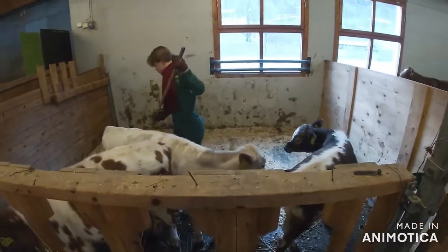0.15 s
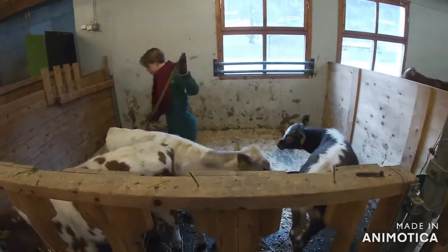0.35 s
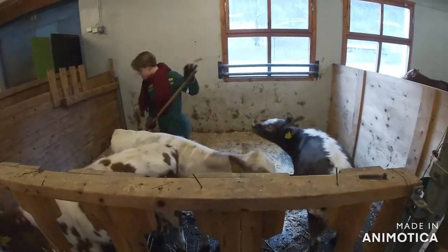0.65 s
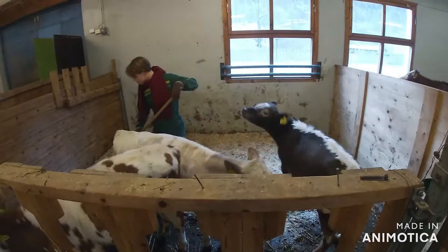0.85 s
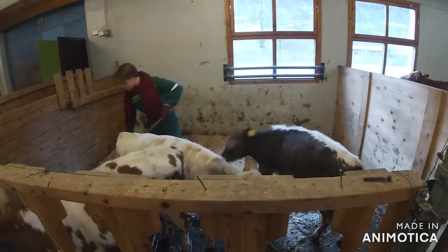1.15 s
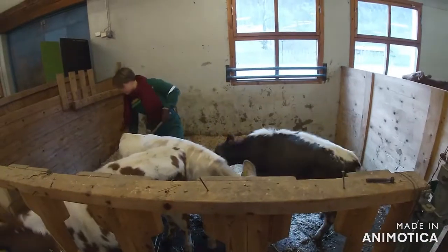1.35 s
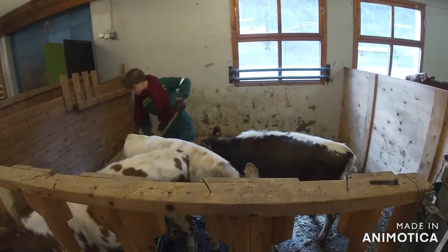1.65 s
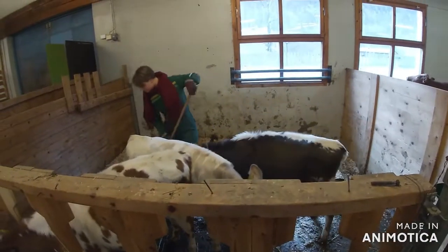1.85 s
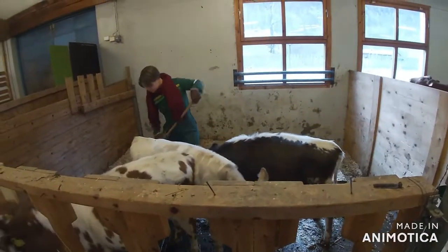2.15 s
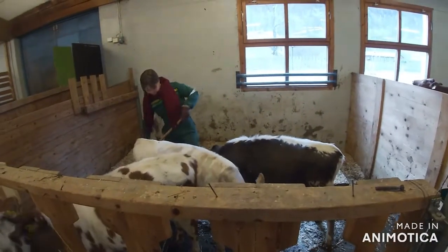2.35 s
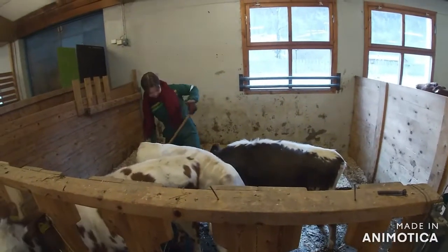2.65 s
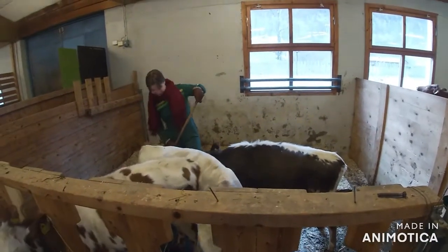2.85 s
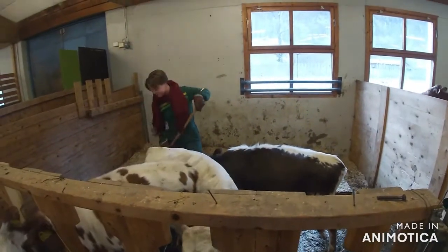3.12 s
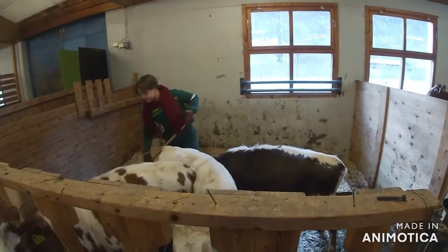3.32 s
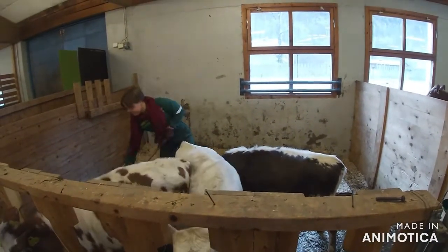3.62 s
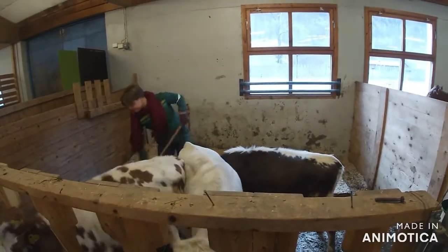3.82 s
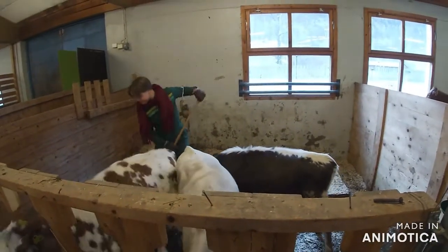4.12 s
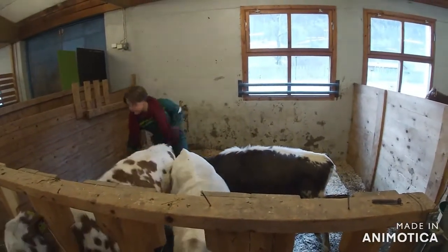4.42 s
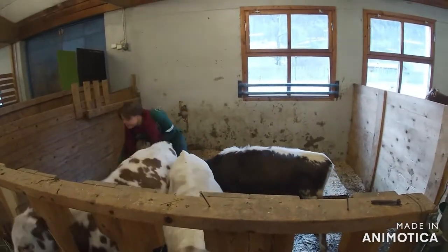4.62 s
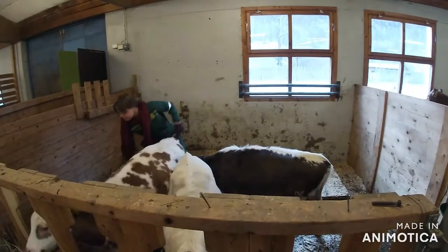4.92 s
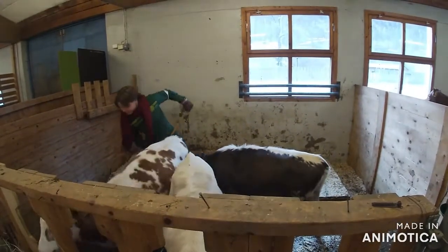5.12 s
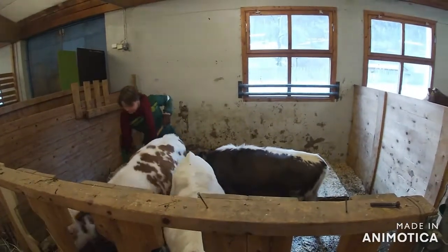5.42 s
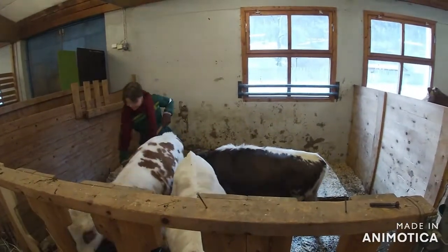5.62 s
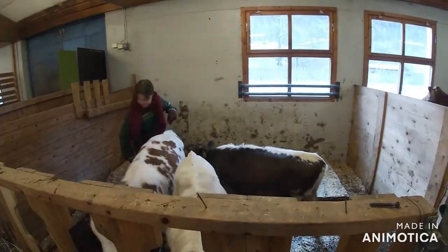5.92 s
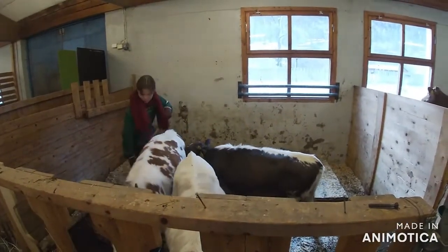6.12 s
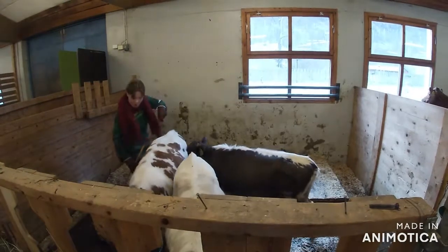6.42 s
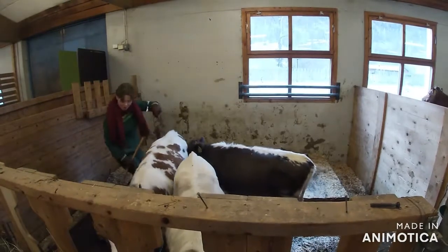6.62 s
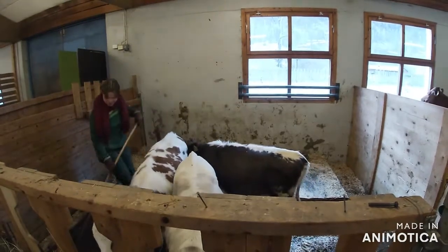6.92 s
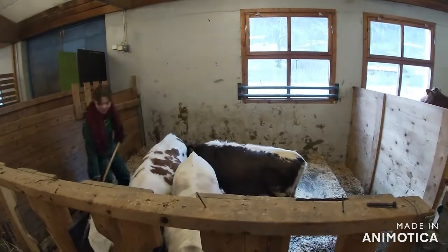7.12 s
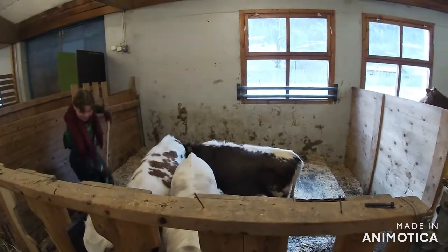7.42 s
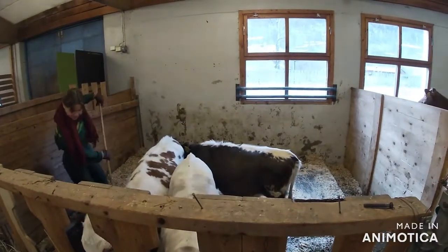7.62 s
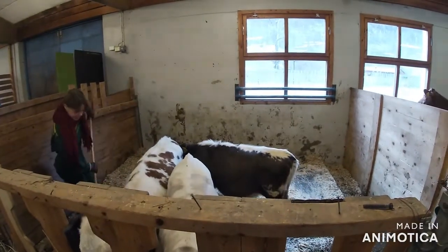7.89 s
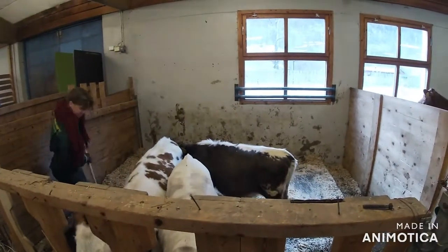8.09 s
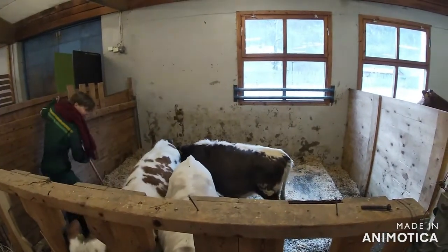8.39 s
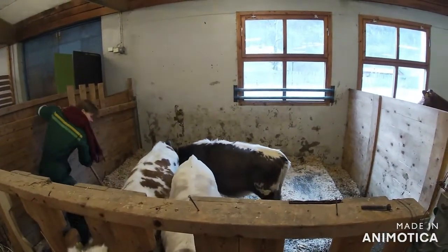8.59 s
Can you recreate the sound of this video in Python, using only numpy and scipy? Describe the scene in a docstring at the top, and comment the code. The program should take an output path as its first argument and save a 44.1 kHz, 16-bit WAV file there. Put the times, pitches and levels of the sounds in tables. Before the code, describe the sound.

A single calf moo dominates the opening three seconds: a muffled hum swelling upward, a bright open-mouthed call, then a tired, growling fall. The rest is quieter barn work, with short fork drags, soft bedding thuds, crackling straw and occasional knocks on floor or wood. Little birds give quick falling chirps throughout. The hard-walled space rings slightly around the mono pickup at moderate distance, over gentle air hiss and rumble.

```python
"""A calf moos once in a hard-walled barn: a closed-mouth hum climbs, bursts open, holds and sinks away.
Its voice is a train of sharp pulses, shaped by the nose and then by the open mouth.
A long-handled fork scrapes and knocks in the straw bedding and hooves shuffle: tiny random slips and noise blows.
Small birds chirp under the roof with gliding, fluttering tones, over steady air noise and a low rumble."""
import sys
import numpy as np
from scipy import signal
from scipy.fft import rfft, irfft, next_fast_len
from scipy.io import wavfile
from scipy.ndimage import uniform_filter1d, map_coordinates

SR = 44100
rng = np.random.default_rng(int(sys.argv[2]) if len(sys.argv) > 2 else 0)


def wav_record(signal):
    """Record a signal, one row per channel, as 16-bit PCM in the file named by sys.argv[1]."""
    frames = np.transpose(np.atleast_2d(signal))
    bounded = np.clip(frames, -1, 1)
    # unit amplitude maps onto the largest positive 16-bit level
    quanta = np.round(bounded * 32767).astype(np.int16)
    wavfile.write(sys.argv[1], SR, quanta)


N = 385875
TIME = np.arange(N) / SR


def from_db(db):
    """Turn decibels into a plain gain."""
    return 10 ** (np.asarray(db) / 20)


def rms_one(x):
    """Scale a sound to an average (rms) strength of one."""
    return x / np.sqrt(np.mean(x ** 2) + 1e-20)


def in_time(rows, t=TIME):
    """Read every column of a timed table at the times t, with straight lines between rows."""
    s, *columns = np.transpose(rows)
    return [np.interp(t, s, c) for c in columns]


def at_hz(points, hz):
    """Read a table of frequencies on a log-frequency axis."""
    f, value = np.transpose(points)
    return np.interp(np.log(hz + 1e-3), np.log(f), value)


def gate(t, start, end, fade):
    """One between start and end, with short ramps outside."""
    return np.clip(1 + np.minimum(t - start, end - t) / fade, 0, 1)


def band(x, low_hz, high_hz):
    """Keep only the sound between two frequencies."""
    sos = signal.butter(2, [low_hz, min(high_hz, .45 * SR)], "band", fs=SR, output="sos")
    return signal.sosfilt(sos, x)


def colour(x, spectrum):
    """Shape a sound by a spectrum, weaken the deepest bass and scale to rms one."""
    size = next_fast_len(len(x))
    hz = np.arange(size // 2 + 1) * SR / size
    gain = from_db(at_hz(spectrum, hz)) * hz / (hz + 10)
    return rms_one(irfft(rfft(x, size) * gain, size)[:len(x)])


def drift(rate, t=TIME):
    """Random wander around zero, with `rate` new random targets per unit of t."""
    knots = rng.standard_normal(8192)
    return np.interp(t * rate % 8191, np.arange(8192), knots)


def grains(per_s, spread_db):
    """Random tiny slips and snaps of uneven size."""
    sizes = from_db(spread_db * np.minimum(rng.exponential(1, N), 4)) * rng.standard_normal(N)
    return rms_one(sizes * (rng.random(N) < per_s / SR))


def at_level(x, db):
    """Even out a sound and give it a level curve."""
    power = np.abs(uniform_filter1d(x * x, size=2048))
    return from_db(db) * x / np.sqrt(power + 1e-9)


def add(out, s, sound):
    """Mix a sound in at time s."""
    at = max(int(s * SR), 0)
    out[at:at + len(sound)] += sound


# how long the barn rings: (frequency [Hz], time to fall by 60 dB [s])
BARN = [(100,1.01),(400,1.195),(1000,0.54),(3000,0.61),(8000,0.31)]


def barn(x, wet_db):
    """Direct sound plus a scattered tail, mostly shorter in the treble; the total power is kept."""
    t, tail = TIME[:SR], 0
    edges = 45 * 2. ** np.arange(10)  # octave bands [Hz]
    for low, high in zip(edges, edges[1:]):
        t60 = at_hz(BARN, np.sqrt(low * high))
        tail = tail + band(rng.standard_normal(SR), low, high) * from_db(-60 * t / t60)
    onset = np.clip(t / 0.0017 - .5, 0, 1)  # a tiny gap before the tail
    tail = rms_one(tail * onset) / np.sqrt(SR)
    wet = from_db(wet_db)
    return (x + wet * signal.fftconvolve(x, tail)[:N]) / np.sqrt(1 + wet ** 2)


# colour of the barn air: (frequency [Hz], relative level per Hz [dB])
AIR = [(20,-26.5),(170,6),(400,-4),(850,-2.5),(2000,-18.5),(3000,-9.5),(6400,-21.5),(9000,-36.5),(15000,-72)]
AIR_DB = -45
# the rumble's middle level, its random swing, and new swing targets per second
RUMBLE_DB, RUMBLE_SWING_DB, RUMBLE_TURNS_PER_S = -52.5, 11, 2.1


def background():
    """Steady barn air is coloured noise; the low rumble is bass noise that comes and goes."""
    air = from_db(AIR_DB) * colour(rng.standard_normal(N), AIR)
    rumble_db = RUMBLE_DB + RUMBLE_SWING_DB * drift(RUMBLE_TURNS_PER_S)
    rumble = from_db(rumble_db) * rms_one(band(rng.standard_normal(N), 48, 86))
    return air + rumble


def chirp(length, start_hz, end_hz, warble=0.039, warble_rate=450, flutter=0.8):
    """A whistle that glides between two pitches; random warble and flutter make it harsh."""
    t = TIME[:int(length * SR)]
    hz = start_hz * (end_hz / start_hz) ** (t / length) * (1 + warble * drift(warble_rate, t))
    loudness = np.sin(np.pi * t / length) * np.exp(flutter * drift(warble_rate / 2, t))
    return loudness * np.sin(2 * np.pi * np.cumsum(hz) / SR)


def arch(length, top_hz, bend_octaves=0.42):
    """A clear note that bends up to its top and down again."""
    u = np.linspace(-1, 1, int(length * SR))
    hz = top_hz / 2 ** (bend_octaves * u ** 2)
    return np.sqrt(1 - u ** 2) * np.sin(2 * np.pi * np.cumsum(hz) / SR)


# falling chirps: (time [s], start pitch [Hz], level [dB])
CHIRPS = [(0,4910,-36),(.128,5890,-30.5),(.45,5740,-38),(.8,5270,-38.5),(1.525,5750,-41),(2.941,6320,-53),(3.141,5210,-57),(3.385,4400,-45),(3.545,5720,-40),(4.125,4690,-38.5),
          (4.38,5280,-41),(4.63,6460,-43),(4.9,4740,-42),(5.24,6580,-41),(5.711,5360,-34),(6.4,4910,-40),(6.824,4000,-38.5),(8.239,6240,-44.5),(8.38,6990,-50),(8.69,5760,-27.5)]
CHIRP_END_HZ, CHIRP_FALL_OCTAVES_PER_S = 3094, 6.6
# clear arched notes: (time [s], top pitch [Hz], level [dB])
ARCHES = [(0.29,4990,-31),(.785,4880,-37),(5.93,3740,-34.5),(7.341,3920,-37),(7.405,3580,-37.5)]
ARCH_S = 0.043
# quick upward flicks: (time [s], level [dB])
FLICKS = [(6.594,-45.5),(6.724,-42),(6.804,-43)]
FLICK_S, FLICK_START_HZ, FLICK_END_HZ = 0.062, 4730, 7250
# thin sagging whistles: (time [s], level [dB])
WHISTLES = [(6.99,-44.5),(7.845,-48.5)]
WHISTLE_S, WHISTLE_START_HZ, WHISTLE_END_HZ = 0.21, 3380, 2850


def birds(lower_ratio=.82, lower_db=-7, far_db=-65, far_hz=4300, count=30):
    """Chirps and flicks use both sides of the voice organ, one lower and weaker; other notes are single."""
    # more birds twitter farther off, at random times and pitches
    far = [(s * N / SR, far_hz * 2 ** (high / 2), far_db) for s, high in rng.random((count, 2))]
    glides = [(s, FLICK_S, FLICK_START_HZ, FLICK_END_HZ, db) for s, db in FLICKS]
    for s, hz, level_db in CHIRPS + far:
        length = np.log2(hz / CHIRP_END_HZ) / CHIRP_FALL_OCTAVES_PER_S
        glides.append((s, length, hz, CHIRP_END_HZ, level_db))
    harsh, pure = np.zeros((2, N + SR))
    for s, length, start_hz, end_hz, level_db in glides:
        upper = chirp(length, start_hz, end_hz)
        lower = chirp(length, lower_ratio * start_hz, lower_ratio * end_hz)
        add(harsh, s, from_db(level_db) * (upper + from_db(lower_db) * lower))
    for s, top_hz, level_db in ARCHES:
        add(pure, s, from_db(level_db) * arch(ARCH_S, top_hz))
    for s, level_db in WHISTLES:
        whistle = chirp(WHISTLE_S, WHISTLE_START_HZ, WHISTLE_END_HZ, warble=0.0068, flutter=0.16)
        add(pure, s, from_db(level_db) * whistle)
    return barn(harsh[:N], wet_db=3) + barn(pure[:N], wet_db=0.5)


def swell(s, build_s, fall_db_per_s, rise_db=14):
    """Gain of one push: it rises by rise_db during build_s, peaks at s and dies away."""
    rise = rise_db * (TIME - s) / build_s
    fall = fall_db_per_s * (s - TIME)
    return from_db(np.maximum(np.minimum(rise, fall), -120))


# fork strokes and shuffles: (peak time [s], build-up [s], thud level [dB], scrape level [dB])
STROKES = [(0.018,0.12,-44,-46),(1.77,0.57,-29,-40),(2.678,0.1,-26.5,-56.5),(3.904,0.12,-26.5,-31.5),(4.06,0.26,-30.5,-41),(4.885,0.17,-31,-34.5),(5.039,0.38,-32.5,-31.5),
           (5.55,0.2,-36,-43.5),(6.41,0.096,-37,-37),(6.56,0.26,-35,-49),(7.35,0.26,-34,-43),(7.55,0.28,-44,-43.5),(8.42,0.1,-37.5,-48)]
# dry straw stirred or tossed: (peak time [s], build-up [s], level [dB])
TOSSES = [(.1,1,-52),(1.35,0.98,-48),(3.97,0.16,-49),(5.05,0.19,-44),(5.7,0.41,-51),(6.8,1,-49),(7.56,0.26,-39.5)]
STROKE_FALL_DB_PER_S, TOSS_FALL_DB_PER_S = 103, 115.5
# colours of packed bedding, dragged fork and dry stalks: (frequency [Hz], relative level per Hz [dB])
THUD = [(35,-2.5),(80,-0.5),(190,2.5),(300,-3.5),(600,-58.5)]
SCRAPE = [(150,-9.5),(270,-3),(550,8),(850,-5),(2400,-13.5),(7000,-50)]
STRAW = [(700,-18.5),(1500,-9),(5800,-7),(7500,-13),(15000,-45)]


def bedding():
    """The fork drags over the floor in small slips, the packed bedding thuds and dry stalks crackle."""
    thud_gain = scrape_gain = straw_gain = 0
    for s, build_s, thud_db, scrape_db in STROKES:
        push = swell(s, build_s, STROKE_FALL_DB_PER_S)
        thud_gain = np.maximum(thud_gain, from_db(thud_db) * push)
        scrape_gain = np.maximum(scrape_gain, from_db(scrape_db) * push)
    for s, build_s, level_db in TOSSES:
        straw_gain = straw_gain + from_db(level_db) * swell(s, build_s, TOSS_FALL_DB_PER_S)
    thud = thud_gain * colour(grains(1000, spread_db=-0.7), THUD)
    scrape = scrape_gain * colour(grains(1100, spread_db=-1.5), SCRAPE)
    straw = straw_gain * colour(grains(5000, spread_db=-2.5), STRAW)
    return barn(thud + scrape + straw, wet_db=-9.0)


# the calf's voice: (time [s], pitch [Hz])
PITCH = [(.27,84.3),(.37,90.74),(.64,101.8),(1.04,139.4),(1.2,150.1),(1.33,163),(1.66,170.9),(2.28,168.6),(2.48,163.9),(2.64,160.9),(2.8,152.2),(2.97,132.7)]
JITTER = .005  # uneven cycle lengths at full roughness (share)


def vocal_folds(t, rough, count=62):
    """The folds give one sharp pulse a cycle, a sum of equal harmonics, unevenly timed under strain."""
    pitch, = in_time(PITCH, t)
    wobble = JITTER * rough * drift(140, t) + 0.00056 * drift(21.77, t)
    cycles = np.cumsum(pitch * (1 + wobble)) / SR
    off = cycles - np.round(cycles)
    folds = rms_one(np.sinc((2 * count + 1) * off) / np.sinc(off))
    return pitch, cycles, folds


# the moo starts as a hum, the mouth bursts open, the voice stops
HUM_START_S, OPEN_S, END_S = 0.17, 1.052, 2.96
# the nasal overtones swell steadily until the mouth opens
NASAL_DB, NASAL_SWELL_DB_PER_S = -46, 19.5
# resonances of the nose: (frequency [Hz], relative level [dB])
NOSE = [(120,-4),(190,2.5),(520,-5),(1000,-7),(1400,-21.5),(2500,-18),(2850,-6.5),(3200,-16.5),(6500,-24.5),(11000,-54)]
# a nasal resonance sinks as the head stretches forward: (time [s], centre [Hz], level beside the nose [dB])
STRETCH = [(.62,2680,-16.5),(.8,2141,-3),(1.0,2090,-4)]


def nasal_overtones(t, pitch, cycles, folds, width_hz=170):
    """With the mouth shut, each pulse rings the nose and its sinking resonance."""
    stretch_hz, stretch_db = in_time(STRETCH, t)
    since = cycles % 1 / pitch  # seconds since the last pulse
    sinking = rms_one(np.sin(2 * np.pi * stretch_hz * since) * np.exp(-np.pi * width_hz * since))
    nasal_db = NASAL_DB + NASAL_SWELL_DB_PER_S * (t - HUM_START_S)
    return at_level(colour(folds, NOSE) + from_db(stretch_db) * sinking, nasal_db)


# level of the hum's fundamental: (time [s], level [dB])
HUM = [(0.29, -47), (0.372, -30), (0.62, -26), (0.884, -38), (1.03, -22.5)]
# the open call's second harmonic, which booms and fades in the barn: (time [s], level [dB])
BOOM = [(1.05,-17),(1.118,-11),(1.21,-27),(1.3,-12),(1.385,-7.5),(1.42,-28),(1.46,-16),(1.634,-16.5),(1.692,-5),(1.788,0.5),
        (2.23,-14),(2.374,-5.5),(2.448,-23.5),(2.63,-4.5),(2.8,-20),(2.84,-18.5),(2.96,-18)]


def chest(t, phase, shut, mouth, tiring, hum_octave_db=-14, fundamental_db=-25.0):
    """The two lowest harmonics carry the weight of the call."""
    hum_db, = in_time(HUM, t)
    boom_db, = in_time(BOOM, t)
    first, second = np.sin(phase), np.sin(2 * phase)
    hum = from_db(hum_db) * (first + from_db(hum_octave_db) * second)
    call = tiring * from_db(fundamental_db) * first + from_db(boom_db) * second
    return shut * hum + mouth * call


# resonances of the wide and the rounded mouth: (frequency [Hz], relative level [dB])
WIDE = [(310,-30),(420,12),(820,9),(1350,-3.5),(1700,0.5),(2000,-2),(2300,-15),(3250,-2.5),(3550,-21.5),(4250,-18.5),(6600,-31),(11000,-58.5)]
ROUND = [(380,-42.5),(500,2),(1020,-1),(1550,-10.5),(2520,-5.5),(3700,-32.5),(6600,-30.5),(10000,-67)]
THROAT_DB = -24.5


def mouth_overtones(folds, opening, bright_db, split_hz=1200):
    """The open mouth blends a wide and a rounded shape; throat and bright parts get their own levels."""
    voiced = opening * colour(folds, WIDE) + (1 - opening) * colour(folds, ROUND)
    throat = signal.sosfiltfilt(signal.butter(4, split_hz, fs=SR, output="sos"), voiced)
    return at_level(throat, THROAT_DB) + at_level(voiced - throat, bright_db)


def resonance(path, t, pitch, phase, width_hz, count=15):
    """A moving mouth resonance lifts the harmonics nearest to its centre."""
    centre_hz, level_db = in_time(path, t)
    k = np.arange(3, count)[:, None]  # harmonic numbers
    weights = 1 / (1 + ((k * pitch - centre_hz) / width_hz) ** 2)
    tone = np.sum(weights * np.sin(k * phase), axis=0)
    return from_db(level_db) * tone / np.sqrt(np.sum(weights ** 2, axis=0))


def boards(x, echo_s=.003, sway_s=.00016, sways_per_s=5, share=.55):
    """An echo off the pen boards shifts as the calf sways, so single overtones surge and drop out."""
    lag = echo_s + sway_s * drift(sways_per_s)
    echo = map_coordinates(x, [(TIME - lag) * SR], order=3)
    return (x + share * echo) / np.hypot(1, share)


# the manner of the call: (time [s], mouth shape [0 rounded - 1 wide], roughness [0-1])
EFFORT = [(1.05,0.7,.35),(1.27,0.67,.45),(1.7,0.52,0.08),(2.2,0.35,0.08),(2.5,1,.15),(2.95,0.81,.9)]
# vowel resonances, (time [s], centre [Hz], level [dB]): low one moving with the jaw, # upper one near 1.6 kHz,
# and one near 1 kHz ringing as the mouth rounds
LOW_VOWEL = [(1.06,760,-39),(1.32,810,-19),(1.66,742,-21.5),(1.92,660,-15),(2.04,687,-31),(2.36,676,-42.5),(2.53,704,-18),(2.76,754,-18.5),(2.88,482,-28.5)]
UPPER_VOWEL = [(1.05,1560,-29),(1.25,1640,-31),(1.66,1680,-37),(1.75,1544,-27.5),(2.27,1720,-51),(2.33,1670,-32.5),(2.85,1620,-35)]
RING_VOWEL = [(1.18,960,-25.5),(1.42,990,-48),(1.63,1006,-24),(1.96,1020,-46.5),(2.04,1053,-23),(2.28,1050,-22.5),(2.39,909,-46)]
# the bright overtones start with a burst that relaxes
BRIGHT_DB, BURST_DB, BURST_S = -33, 13, 0.5
# a coarse treble rasp, its level relative to the bright overtones
RASP_DB, RASP_LOW_HZ, RASP_HIGH_HZ = -18, 3400, 4600
# the calf runs out of air: all of the open call but its second harmonic sinks
TIRE_S, TIRE_DB_PER_S = 2.724, 23
# the voice breaks into coarse pulses as it falls
BREAK_S, BREAK_FADE_S, SPUTTER_PER_S, SPUTTER_DEPTH = 2.835, 0.043, 23, .75
# at full roughness: uneven strength, strong-weak alternation of cycles (shares)
SHIMMER, GROWL = .55, .3


def calf():
    """Vocal folds drive the nose, then the mouth; strain makes the cycles uneven."""
    t = TIME[TIME < END_S + .1]
    opening, rough = in_time(EFFORT, t)
    pitch, cycles, folds = vocal_folds(t, rough)
    phase = 2 * np.pi * cycles
    shut = gate(t, HUM_START_S, OPEN_S, fade=0.01)
    mouth = gate(t, OPEN_S, END_S, fade=0.02)
    tiring = from_db(-TIRE_DB_PER_S * np.maximum(t - TIRE_S, 0))
    voice = mouth * tiring
    bright_db = BRIGHT_DB + BURST_DB * np.exp(-np.abs((t - OPEN_S) / BURST_S) ** 3)
    overtones = shut * nasal_overtones(t, pitch, cycles, folds)
    overtones = overtones + voice * mouth_overtones(folds, opening, bright_db)
    low_vowel = resonance(LOW_VOWEL, t, pitch, phase, width_hz=77)
    high_vowel = resonance(RING_VOWEL, t, pitch, phase, width_hz=82)
    vowel = voice * (low_vowel + high_vowel)
    twang = voice * resonance(UPPER_VOWEL, t, pitch, phase, width_hz=110)
    # the rasp follows the pulses of the folds, with strength drifting from cycle to cycle
    pulses = rms_one(band(folds, RASP_LOW_HZ, RASP_HIGH_HZ) * np.exp(drift(1, cycles) / 2))
    rasp = voice * from_db(bright_db + RASP_DB) * pulses * np.exp(-((t - OPEN_S) / BURST_S) ** 2)
    tones = np.sqrt(2) * (chest(t, phase, shut, mouth, tiring) + vowel) + rasp
    breaking = gate(t, BREAK_S, np.inf, BREAK_FADE_S)
    sputter = 1 + SPUTTER_DEPTH * breaking * np.cos(2 * np.pi * SPUTTER_PER_S * (t - BREAK_S))
    # under strain strong and weak cycles alternate: a growl
    uneven = rough * (SHIMMER * drift(77, t) + GROWL * drift(12, t) * np.cos(phase / 2))
    # held tones and rasp arrive mostly direct; the overtones fill the barn
    rest = (0, N - len(t))
    direct = barn(np.pad(tones * sputter * (1 + uneven / 2), rest), wet_db=-12)
    filling = barn(np.pad((overtones + twang) * sputter * (1 + uneven), rest), wet_db=3)
    return direct + boards(filling)


# fork and hooves: (time [s], starting level [dB], centre [Hz], width [octaves], time to fall by 60 dB [s])
KNOCKS = [(3.875,-30.5,604,3.2,0.21),(3.889,-19,352,1.8,0.035),(3.971,-20,250,2.8,0.054),(4.723,-21,334,1.8,0.14),(5.022,-24,555,0.93,0.25),
          (6.285,-40,1200,0.43,1),(6.608,-30.5,160,3,0.068),(7.097,-31,1490,1.37,0.41),(7.336,-26.5,456,0.77,0.083)]


def knocks():
    """A blow is a short crunch of noise: low and dull on the floor, higher on wood and tines."""
    out = np.zeros(N + SR)
    t = TIME[:SR // 2]
    for s, level_db, centre_hz, octaves, t60 in KNOCKS:
        half = 2 ** (octaves / 2)
        crunch = rms_one(band(rng.standard_normal(len(t)), centre_hz / half, centre_hz * half))
        add(out, s, from_db(level_db) * crunch * from_db(-60 * t / t60))
    return barn(out[:N], wet_db=-7)


def scene():
    """All the sounds together, as one channel."""
    return (background() + birds() + bedding() + calf() + knocks())[None]


def record(dry, threshold_db=-24, reduction_share=0.39, cutoff_hz=16000):
    """Gain control turns loud sound down, following its short-term level; the top is cut steeply."""
    level_db = 10 * np.log10(np.abs(uniform_filter1d(dry * dry, size=4096)) + 1e-12)
    gain = from_db(-reduction_share * np.maximum(level_db - threshold_db, 0))
    return signal.sosfilt(signal.cheby2(12, 70, cutoff_hz, fs=SR, output="sos"), gain * dry)


dry = scene()
out = record(dry)
wav_record(out)
```